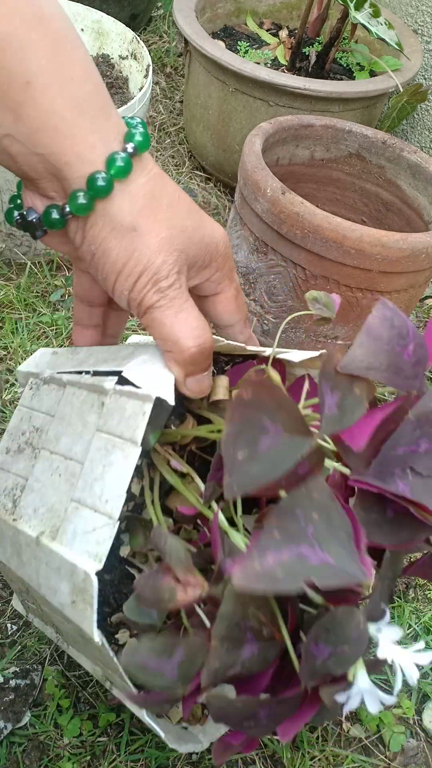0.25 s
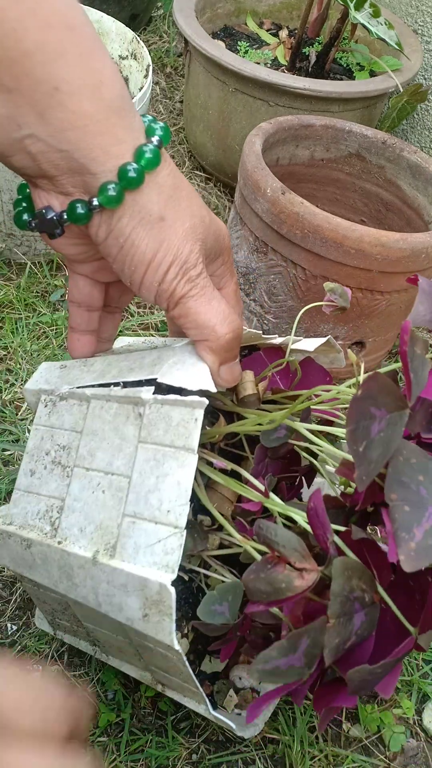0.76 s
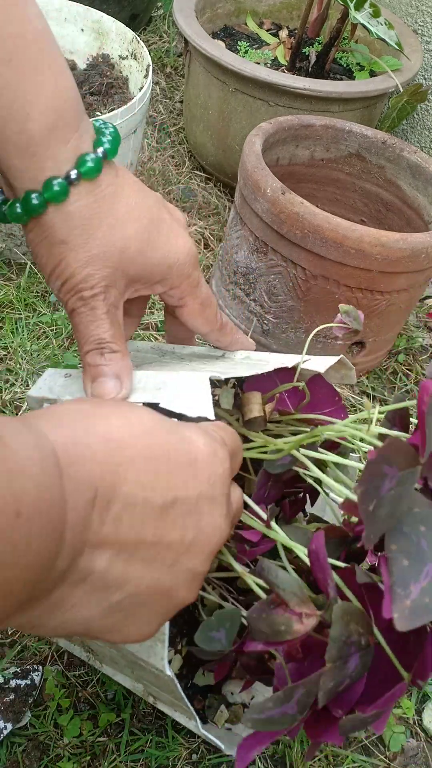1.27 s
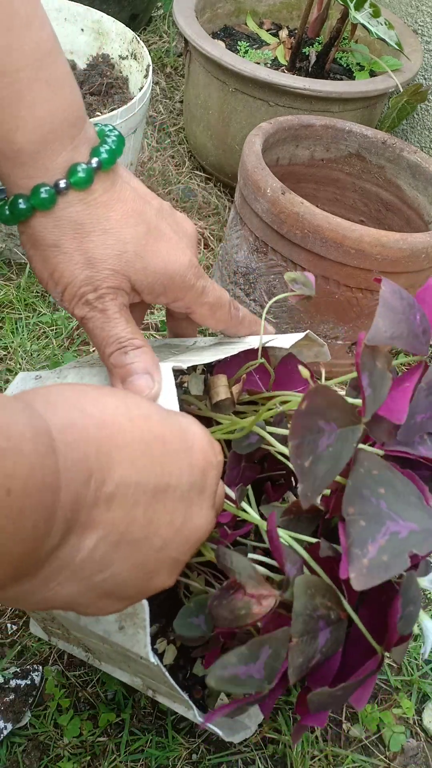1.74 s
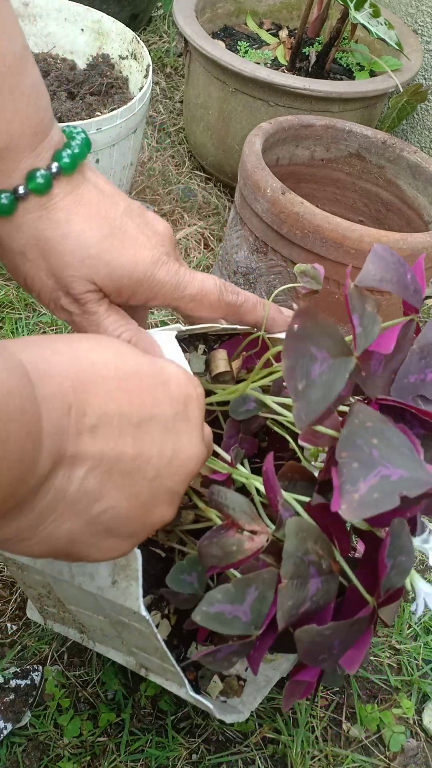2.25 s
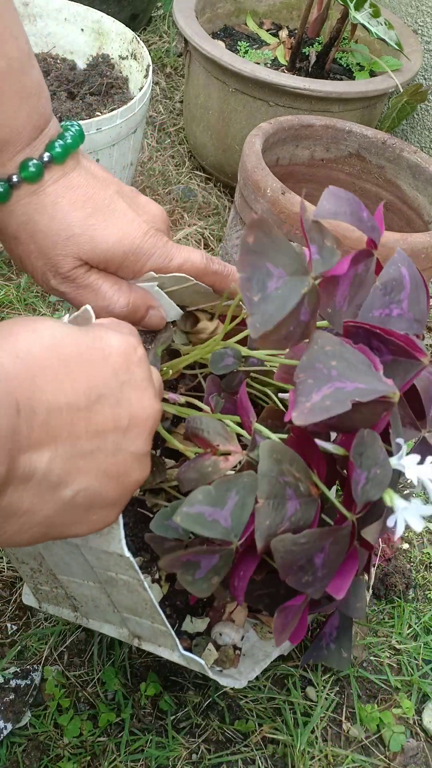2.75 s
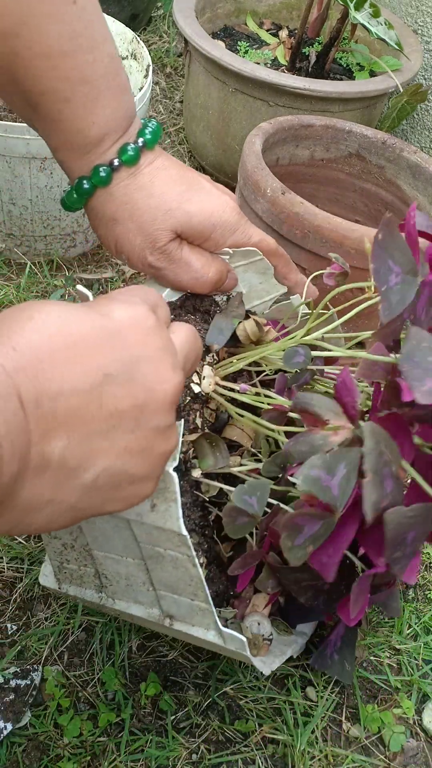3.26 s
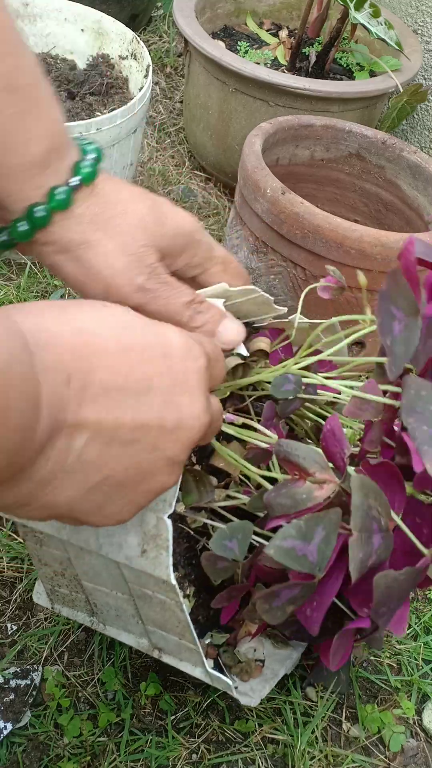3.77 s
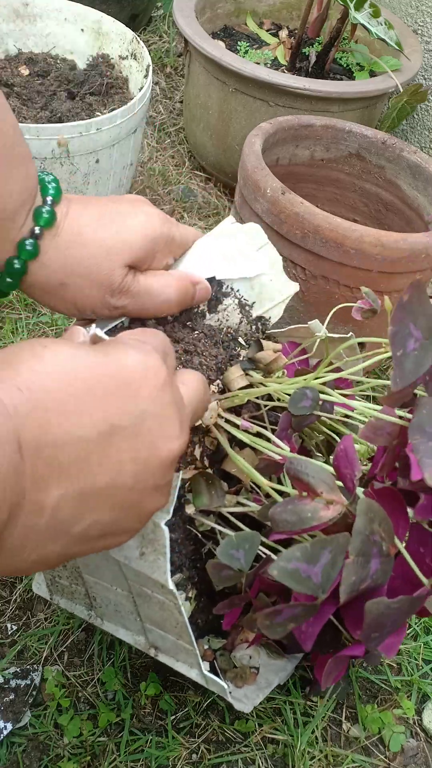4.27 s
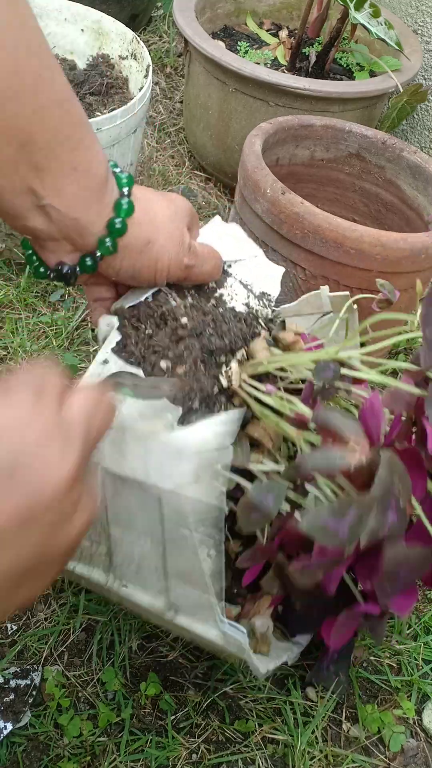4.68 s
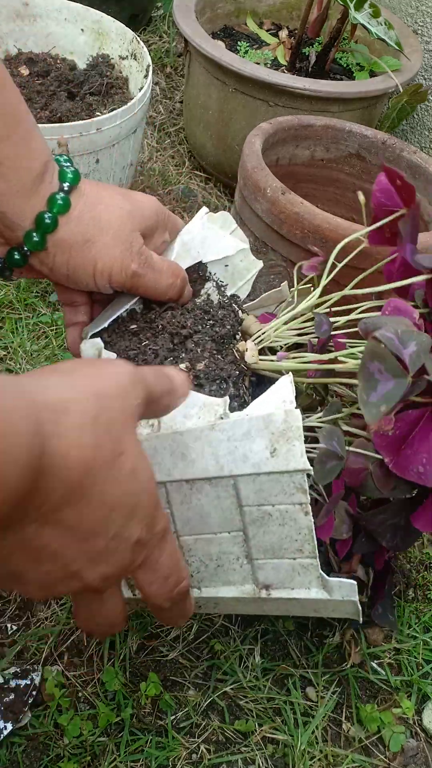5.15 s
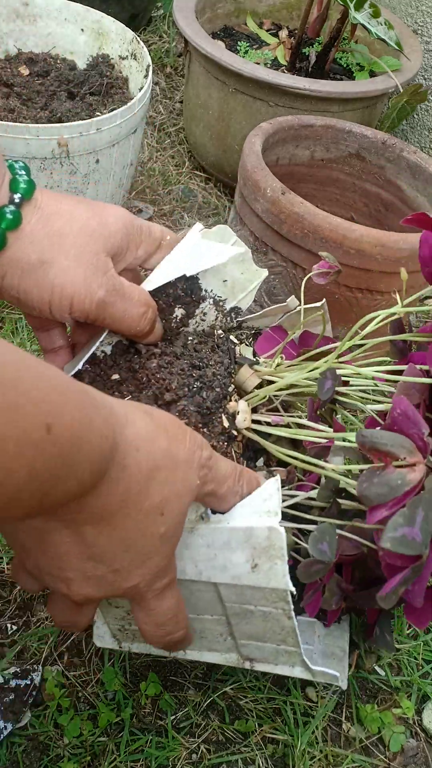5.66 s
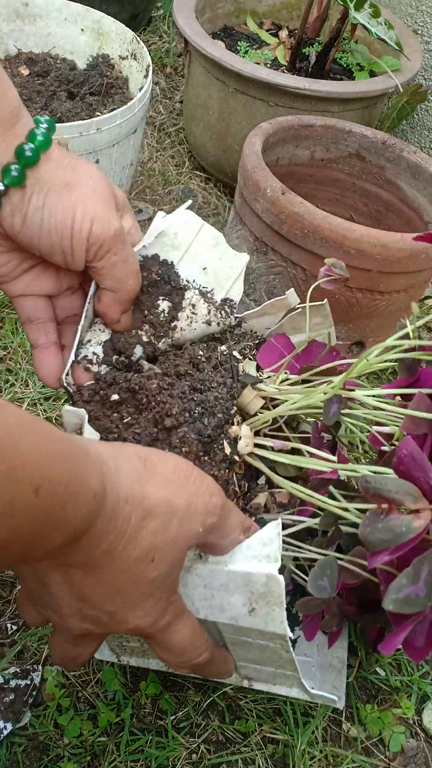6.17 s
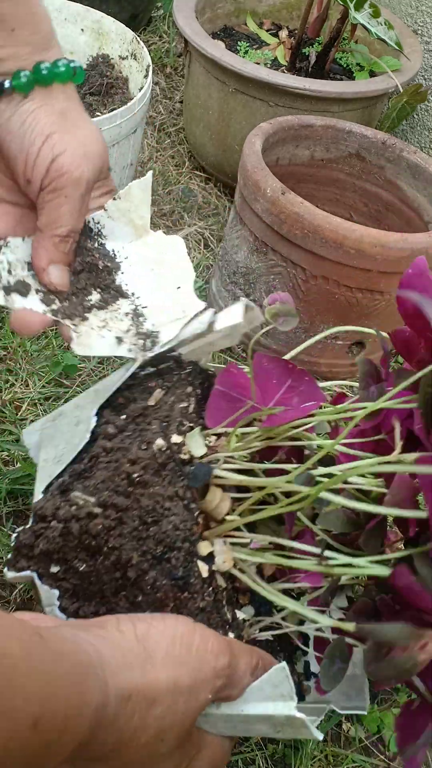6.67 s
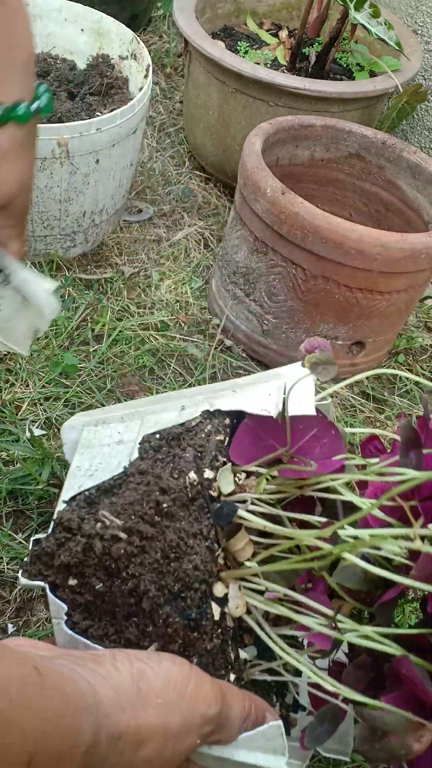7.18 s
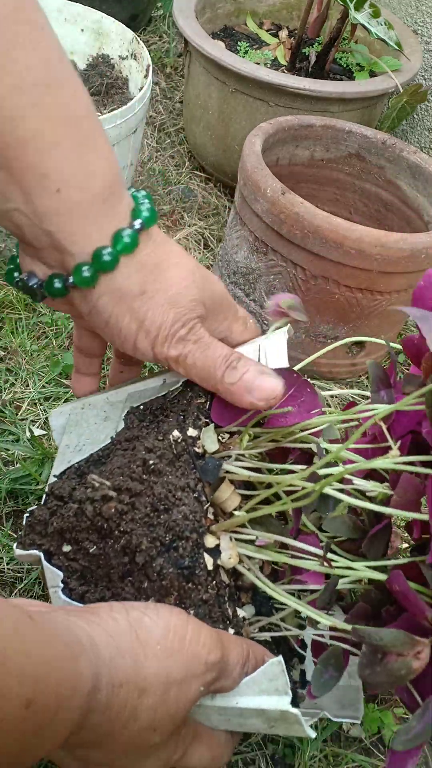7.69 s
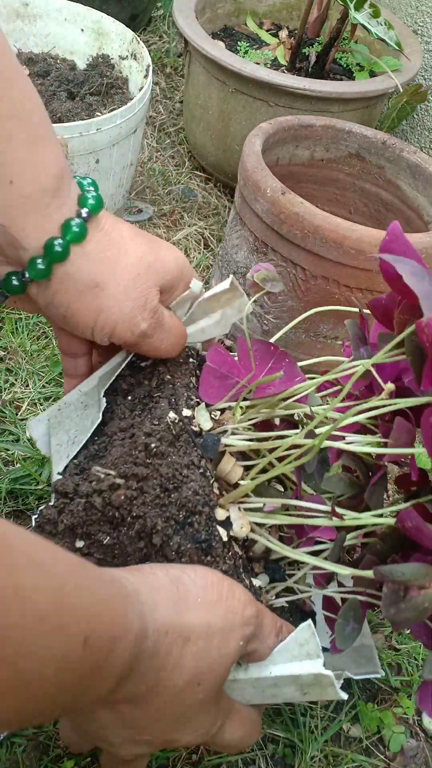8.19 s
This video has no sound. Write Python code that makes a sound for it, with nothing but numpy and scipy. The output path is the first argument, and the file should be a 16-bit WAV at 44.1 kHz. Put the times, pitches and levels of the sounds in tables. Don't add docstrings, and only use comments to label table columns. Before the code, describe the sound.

Outdoors, close to a stereo microphone, a brittle plastic planter is broken by hand. Low wavering machine hum, distant traffic rumble and soft hiss run throughout. From 0 to 0.5 s come small, dull, hollow cracks and creaks; at 0.8 to 0.95 s a bright crackly cluster with scattering flakes. A tiny far bird chirps faintly at about 0.6 and 1.0 s. Then mostly quiet creaks and soil grit, with a soft crack at 2.05 s. Hard snaps hit at 3.1, 3.35 and 3.55 s. The loudest, a sharp double crack, comes at 4.75 s, followed until 5.25 s by pattering flakes, soil and lesser cracks. Light rubbing follows near 5.8 s, a strong bright double snap at 6.4 s with crumbling debris, and a hollower crack at 6.97 s. Faint creaks and ticks remain until 8.4 s. Background dips momentarily around the strongest snaps.

```python
import sys
import numpy as np
from scipy import signal
from scipy.fft import rfft, irfft
from scipy.io import wavfile
from scipy.ndimage import uniform_filter1d

SR = 44100
rng = np.random.default_rng(int(sys.argv[2]) if len(sys.argv) > 2 else 0)


def wav_record(signal):
    frames = np.transpose(np.atleast_2d(signal))
    bounded = np.clip(frames, -1, 1)
    quanta = np.round(bounded * 32767).astype(np.int16)
    wavfile.write(sys.argv[1], SR, quanta)


def to_linear_factor(level_db):
    exponent = np.asarray(level_db, float) / 20
    return 10 ** exponent


N = 371763

# (time [s], peak [dB], thump under 1.5 kHz [dB], shard ring [Hz], fizz above 8 kHz [dB])
FRACTURES = [(0.1134, -24, -11, 2170, -27), (0.1261, -23, -6, 2320, -24), (0.2946, -24.5, -4, 1920, -46),
             (0.4668, -25.5, -17, 5950, -17), (0.8087, -14, -25, 4150, -17),
             (0.8192, -19, -33, 2226, -14.5), (0.8422, -14, -28, 5630, -15),
             (0.9221, -18.5, -24, 2490, -28), (0.935, -22.5, -17.5, 2360, -38),
             (0.9492, -23, -19, 4660, -28), (2.0533, -24, -6.5, 2040, -30), (3.0829, -6, -10, 3750, -29),
             (3.3377, -12.5, -16.5, 2470, -20.5), (3.5499, -4.5, -12.5, 5960, -18.5),
             (3.5615, -9, -13.5, 2720, -22), (4.7358, -1, -17.5, 5670, -28.5),
             (4.7932, -2, -16, 2623, -28.5), (5.0848, -18, -40, 2063, -31), (5.1586, -22, -16, 1774, -27),
             (6.3751, -8.5, -24, 5070, -23), (6.3894, -8, -20, 4750, -26.5), (6.9665, -9, -7.5, 2670, -25),
             (6.9788, -21, -1, 1760, -45)]
# (time [s], peak [dB], shard ring [Hz])
CREAKS = [(0.0283, -33.5, 2620), (0.0533, -35, 5200), (0.0807, -51, 1980), (0.131, -27.5, 2300),
          (0.1414, -36, 1620), (0.298, -25, 2250), (0.472, -37, 5700), (1.0256, -35.5, 1570),
          (1.1857, -30, 2950), (1.4494, -54, 1760), (1.8118, -31, 1580), (2.8594, -43, 2570),
          (3.04, -38, 5440), (3.2216, -30.5, 1920), (3.5344, -26.5, 1980), (4.2921, -36, 2540),
          (4.557, -40, 2640), (4.6838, -35.5, 5400), (5.3053, -29, 2350), (5.8177, -37, 3030),
          (5.8694, -56, 3000), (6.8104, -38, 2470), (6.8972, -34.5, 1710), (7.0888, -35.5, 1700),
          (7.2125, -32.5, 1730), (7.3936, -34, 6500), (7.9947, -38.5, 2580), (8.1075, -42, 5100),
          (8.2147, -42.5, 1920), (8.4118, -39, 2760)]
# (time [s], peak [dB], ring [Hz])
FLAKES = [(0.035, -30.5, 1300), (0.090, -39, 5900), (0.100, -43, 5870), (0.164, -49, 1780),
          (0.813, -12, 5600), (0.826, -22, 5200), (0.848, -28, 5400), (4.9307, -33, 1900),
          (4.940, -34, 1600), (4.959, -31, 2070), (4.9736, -29.5, 2410), (4.9997, -28, 2040),
          (5.0224, -28, 2030), (5.034, -35, 2310), (5.0574, -30.5, 2270), (5.0752, -27, 2050),
          (5.106, -40, 2200), (5.1256, -29, 1910), (5.1825, -35, 5340), (5.2183, -34.5, 2270),
          (5.2614, -41, 2200), (5.986, -34.5, 2060), (6.575, -45, 5250), (6.6056, -35, 2100),
          (6.621, -38, 4870), (6.66, -38, 4470), (6.7276, -38, 2190), (6.7393, -29, 4800),
          (6.853, -43, 5300), (6.92, -50, 5400)]
# (frequency [Hz], density [dB per Hz])
CRACK_SPECTRUM = [(710, -16.5), (1200, -3.5), (1430, -9.5), (2640, 1), (3120, -4), (4190, -6), (5630, -1),
                  (6940, -12), (7660, -15.5), (9640, -22.5), (11200, -20), (15100, -20), (16500, -22)]
# (frequency [Hz], density [dB per Hz])
THUMP_SPECTRUM = [(120, -57), (200, -6.5), (381, -7.5), (670, -9), (933, -3), (1200, 0), (1600, -10.5),
                  (2080, -24.5), (3520, -120)]
# (time [s], left-right difference [dB])
HAND_BALANCE = [(0.0, 2.5), (0.3, -5.5), (0.47, 2.5), (0.95, 5), (1.1, 0.5), (3.1, -1.5), (4.5, -1.5),
                (4.8, 2), (5.1, -0.5), (5.3, -0.5), (6.0, 0), (6.4, -4), (6.7, -1.5), (7.0, -3.5)]
# (centre time [s], length [s], level [dB], share of dry plastic grit [0-1])
RUBS = [(0.046, 0.11, -73, 0), (0.47, 0.046, -54, 0.5), (0.837, 0.08, -38.5, 0.7), (0.953, 0.19, -52, 1),
        (1.462, 0.1, -52, 0.5), (2.857, 0.081, -51, 1), (3.138, 0.3, -51, 0.1), (3.596, 0.14, -46, 0.1),
        (3.677, 0.17, -52, 0.5), (3.863, 0.11, -58, 0.5), (4.299, 0.044, -40.5, 0.46),
        (4.824, 0.076, -39, 0), (4.883, 0.094, -53, 0.7), (4.965, 0.13, -42.5, 0.12),
        (5.033, 0.11, -45.5, 0.7), (5.123, 0.059, -52, 0.5), (5.845, 0.25, -50, 0.26),
        (6.432, 0.27, -46.5, 0.5), (6.53, 0.14, -55, .7), (6.622, 0.027, -46.5, .7),
        (6.831, 0.11, -48, 0.3), (7.01, 0.062, -73, .4), (7.42, 0.087, -54, .4), (8.146, 0.092, -58, .4)]
# (time [s], crumbling level [dB])
SOIL_EFFORT = [(0.0, -50), (0.47, -55.5), (1.01, -53.5), (2.79, -56), (3.76, -54), (4.1, -54), (4.8, -56),
               (4.97, -51.5), (5.3, -57.5), (5.82, -55), (6.36, -56.5), (6.55, -55.5), (7.0, -54),
               (7.79, -61), (8.43, -56)]
# (frequency [Hz], density [dB per Hz])
SOIL_SPECTRUM = [(290, -41), (500, -23.5), (546, -11.5), (710, -3.5), (1050, -6), (2160, -3.5), (3400, -13),
                 (5930, -15), (9740, -41), (15100, -29), (16500, -50)]
# (time [s], peak [dB], pitch [Hz])
CHIRPS = [
    (0.632, -41, 4820),
    (0.979, -42, 4830),
    (0.998, -44, 4830),
]
# (time [s], lower hum level [dB], upper hum level [dB])
HUM_LOAD = [(0.0, -38.5, -64), (0.14, -39.5, -44), (0.59, -45, -45.5), (2.02, -41.5, -47),
            (2.23, -51, -36.5), (2.86, -61, -47.5), (2.96, -34.5, -45), (3.03, -66, -42.5),
            (3.36, -44, -43), (4.58, -42, -45), (4.79, -56.5, -54.5), (5.1, -45, -47.5), (7.07, -48, -53),
            (7.35, -43.5, -46.5), (8.36, -44, -51.5), (8.43, -57, -48)]
# (time [s], frequency [Hz])
UPPER_HUM_PITCH = [
    (0, 161.3),
    (2.1, 154.1),
    (3.2, 148.4),
    (4.3, 149.3),
    (4.55, 159.3),
    (7.3, 149.4),
    (7.6, 163.1),
    (8.43, 161.8),
]
# (centre time [s], width [s], rise [dB])
OVERTONE_SWELL = (0.42, 0.26, 10)
# (time [s], level [dB])
TRAFFIC = [
    (0.0, -45.5),
    (0.11, -43),
    (2.46, -45),
    (2.89, -44),
    (4.75, -45.5),
    (5.07, -49.5),
    (5.89, -45),
    (8.43, -48),
]
# (frequency [Hz], density [dB per Hz])
RUMBLE_SPECTRUM = [(20, -39), (40, -16), (52, -1), (62, -8.5), (100, 7.5), (190, 0), (220, -3.5), (400, -8),
                   (600, -14), (1000, -18.5), (1500, -49), (3000, -65.5)]
# (frequency [Hz], density [dB per Hz])
HISS_SPECTRUM = [(500, -24), (1300, -26), (2600, -21), (3200, -31), (4000, -38.5), (5400, -30), (6500, -42),
                 (8000, -48.5), (10000, -50.5), (13500, -47.5), (15500, -51), (15900, -106)]
# (frequency [Hz], left-right likeness [-1 to 1])
PORT_LIKENESS = [(60, 0.97), (180, 1), (550, 0.61), (1650, 0.0029), (4970, 0.033), (15000, 0.101)]
# (time [s], depth [dB])
GAIN_DROPS = [
    (.809, -2),
    (3.083, 6),
    (3.549, 14),
    (4.736, 18),
    (4.793, 10),
    (6.375, 18.5),
    (6.966, 7),
]


def evened(x):
    return x / np.sqrt(np.mean(x ** 2) + 1e-20)


def read(points, hz):
    f, value = np.transpose(points)
    return np.interp(np.log(hz + 1), np.log(f + 1), value)


def curve(rows, count=1):
    rows = np.array(rows)
    return np.interp(np.arange(N) / SR, rows[:, 0], rows[:, count])


def add(mix, s, sound):
    part = mix[:, round(s * SR):][:, :sound.shape[1]]
    part += sound[:, :part.shape[1]]


def colour(points, size=1024):
    half = np.maximum(read(points, np.fft.rfftfreq(size, 1 / SR)), -70) * np.log(10) / 20
    log_gain = np.r_[half, half[-2:0:-1]]
    taps = np.fft.ifft(np.exp(np.conj(signal.hilbert(log_gain)))).real[:size // 2]
    return taps / np.linalg.norm(taps)


def snap(row, crack, thump, t60=0.028, first=0.71, unlike=0.8, grainy_db=1.0, lift_db=3.5, body_db=6.0,
         edge_db=22.5):
    s, peak_db, thump_db, ring_hz, fizz_db, ringing, pan_db = row
    t, hz = np.arange(2400) / SR, np.fft.rfftfreq(4096, 1 / SR)
    shared, *own, jerks, place = rng.standard_normal((5, len(t)))
    shape = (1 - np.exp(-(t * 3000) ** 2)) * to_linear_factor(-60 * t / t60)
    shape *= 1 + first * np.exp(-t * 900)
    shape *= to_linear_factor(grainy_db * evened(uniform_filter1d(jerks, 40)))

    spectrum = rfft((shared + unlike * np.array(own)) * shape, 4096)
    spectrum /= np.sqrt(uniform_filter1d(abs(spectrum) ** 2, size=70))
    ring = 1 + ringing / (1 + 2j * (hz - ring_hz) / 600)
    edge = to_linear_factor((fizz_db + edge_db) / (1 + (7500 / (hz + 1)) ** 12))
    bright = irfft(spectrum * crack * ring * edge)
    low = irfft(spectrum * thump)
    both = bright / abs(bright).max() + to_linear_factor(thump_db + body_db) * low / abs(low).max()
    both *= to_linear_factor(peak_db + lift_db)

    lead = (3 * pan_db + 8 * np.tanh(place[0])) / SR
    turn = np.array([[0.5], [-0.5]]) * lead * hz
    both = irfft(rfft(both) * np.exp(2j * np.pi * turn))
    both = np.roll(both, 66, 1)
    return s - 76 / SR, both * to_linear_factor([[pan_db / 2], [-pan_db / 2]])


def garden(x, t60=0.22, level_db=-20):
    taps = np.zeros((2, SR // 4))
    slots = np.arange(100, SR // 4 - 20, 20)
    at = slots + rng.integers(0, 20, (2, len(slots)))
    np.put_along_axis(taps, at, rng.choice([-1., 1.], at.shape), 1)
    taps *= to_linear_factor(-60 * np.arange(SR // 4) / SR / t60)
    return to_linear_factor(level_db) * signal.oaconvolve(x, taps / np.linalg.norm(taps[0]), axes=1)[:, :N]


def crumble(per_s=600, spread_db=4.5, still_db=-57.5, t60=0.072, lift_db=4.0):
    size = to_linear_factor(spread_db * np.minimum(rng.exponential(1, N), 5)) * (rng.random(N) < per_s / SR)
    decaying = signal.lfilter([1], [1, -to_linear_factor(-60 / t60 / SR)], size)
    scratches = decaying * rng.standard_normal((2, N))
    soil = evened(signal.oaconvolve(scratches, colour(SOIL_SPECTRUM)[None])[:, :N])
    grit = evened(signal.oaconvolve(scratches, colour(CRACK_SPECTRUM)[None])[:, :N])

    soil_power = np.maximum(to_linear_factor(2 * curve(SOIL_EFFORT)) - to_linear_factor(2 * still_db), 0)[None]
    soil_power = to_linear_factor(2 * lift_db) * soil_power
    grit_power = np.zeros((1, N))
    for s, length, db, share in RUBS:
        stroke = to_linear_factor(2 * db) * np.hanning(round(length * SR))[None] ** 2
        start = max(s - length / 2, 0)
        add(soil_power, start, (1 - share) * stroke)
        add(grit_power, start, share * stroke)
    return soil * np.sqrt(soil_power) + grit * np.sqrt(grit_power)


def chirp(s, peak_db, hz, length=0.012):
    t = np.arange(0, length, 1 / SR)
    note = np.sin(2 * np.pi * hz * t * (1.02 - 0.018 * t / length))
    note *= to_linear_factor(peak_db) * np.hanning(len(t))
    return s, np.array([note, 0.45 * note])


def hum(low_hz=126, top_hz=372, top_db=-59, over_hz=284, over_db=-56.5, balance_db=0.9,
        fades_per_s=5.0, fade_share=0.53):
    def slow(size):
        drift = evened(uniform_filter1d(rng.standard_normal(N // 256 + 2), size))
        return np.interp(np.arange(N) / 256, np.arange(len(drift)), drift)

    def tone(hz, waver_hz):
        return np.sqrt(2) * np.sin(2 * np.pi * np.cumsum(hz + waver_hz * slow(size=14)) / SR)

    def fading():
        t = np.arange(0, N + 256, 256) / SR
        rate, turn = rng.random((2, 12, 1))
        paths = np.exp(2j * np.pi * ((2 * rate - 1) * fades_per_s * t + turn))
        scattered = paths.sum(0) / np.sqrt(len(rate))
        return np.interp(np.arange(N) / 256, np.arange(len(t)), evened(abs(1 + fade_share * scattered)))

    tones = to_linear_factor(curve(HUM_LOAD)) * fading() * tone(low_hz, 2.1)
    tones += to_linear_factor(curve(HUM_LOAD, count=2)) * fading() * tone(curve(UPPER_HUM_PITCH), 2.26)
    s, width, swell_db = OVERTONE_SWELL
    swell = to_linear_factor(over_db + swell_db * np.exp(-((np.arange(N) / SR - s) / width) ** 2))
    tones += swell * fading() * tone(over_hz, 3.58)
    tones += to_linear_factor(top_db) * tone(top_hz, 1.0)
    return tones * to_linear_factor([[balance_db], [-balance_db]])


def wash(patchy_db=0.98, lift_db=9.0, hiss_db=-35.0, level_db=-12.5):
    frames, hz = N // 256 + 5, np.fft.rfftfreq(1024, 1 / SR)
    a, b, c, d, patches = rng.standard_normal((frames, 513, 5)).T
    patches = evened(uniform_filter1d(uniform_filter1d(patches, 12, 0), 14, 1))
    same = np.clip(read(PORT_LIKENESS, hz), -1, 1)[:, None]
    left = a + 1j * b
    z = np.array([left, same * left + np.sqrt(1 - same ** 2) * (c + 1j * d)])
    swell_db = np.interp(np.arange(frames) * 256 / SR, *np.transpose(TRAFFIC)) + lift_db
    rumble = to_linear_factor(read(RUMBLE_SPECTRUM, hz)[:, None] + swell_db)
    hiss = to_linear_factor(read(HISS_SPECTRUM, hz)[:, None] + hiss_db)
    z = z * np.hypot(rumble, hiss) * to_linear_factor(patchy_db * patches)
    return to_linear_factor(level_db) * signal.istft(z, nperseg=1024, noverlap=768)[1][:, :N]


def ducking(ahead=0.034, recover=0.021):
    t, down_db = np.arange(N) / SR, np.zeros(N)
    for s, depth_db in GAIN_DROPS:
        ramp = np.clip(1 + (t - s + 0.0031) / ahead, 0, 1)
        ramp *= np.exp(-np.maximum(t - s, 0) / recover)
        down_db = np.maximum(down_db, depth_db * ramp)
    return to_linear_factor(-down_db)


def holed(x):
    hz, t, z = signal.stft(x, SR, nperseg=1024, noverlap=512)
    draw = rng.random((257, len(t) // 3 + 1))
    draw = np.kron(draw, np.ones((2, 3)))[:len(hz), :len(t)]
    silent = 0.45 * (hz > 7600) + 0.55 * (hz > 15600)
    kept = (draw > silent[:, None]) / np.sqrt(np.maximum(1 - silent, 0.5))[:, None]
    return signal.istft(z * kept, SR, nperseg=1024, noverlap=512)[1][:, :N]


def scene():
    crack, thump = rfft(colour(CRACK_SPECTRUM), 4096), rfft(colour(THUMP_SPECTRUM), 4096)
    near, far = np.zeros((2, 2, N))
    breaks = [(*row, 1) for row in FRACTURES]
    breaks += [(s, db, -14.5, hz, -22.5, 6.6) for s, db, hz in CREAKS]
    breaks += [(s, db, -47.5, hz, -26.5, 2.9) for s, db, hz in FLAKES]
    for row in breaks:
        pan_db = np.interp(row[0], *np.transpose(HAND_BALANCE))
        add(near, *snap((*row, pan_db), crack, thump))
    for row in CHIRPS:
        add(far, *chirp(*row))
    steady = wash() + hum() + far + crumble()
    return near + garden(near) + holed(ducking() * steady)


def top_cut(x):
    return signal.sosfilt(signal.butter(12, 16500, fs=SR, output="sos"), x)


def record(dry):
    dry = signal.sosfilt(signal.butter(2, 58, "high", fs=SR, output="sos"), dry)
    low_pass = signal.firwin(255, 16300, window=("kaiser", 9), fs=SR)
    dry = signal.oaconvolve(dry, low_pass[None], "same")
    return top_cut(np.clip(dry, -1, 1))


dry = scene()
out = record(dry)
wav_record(out)
```